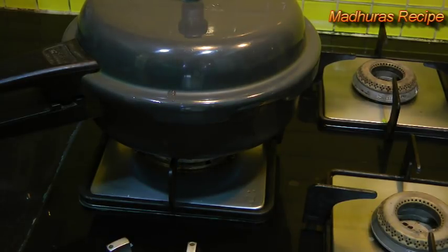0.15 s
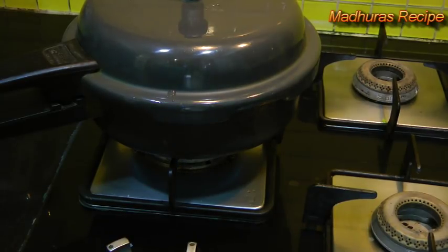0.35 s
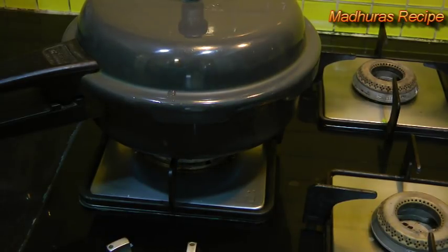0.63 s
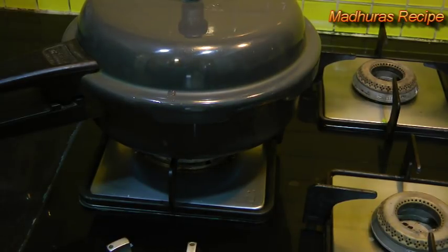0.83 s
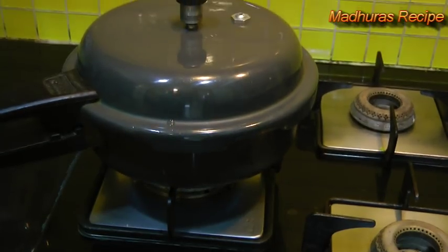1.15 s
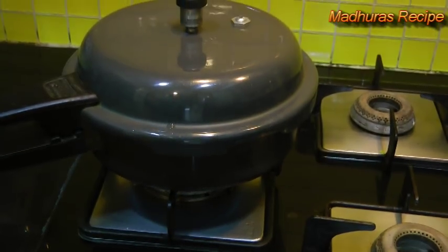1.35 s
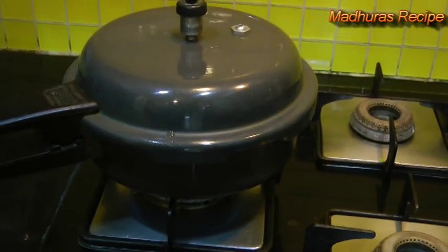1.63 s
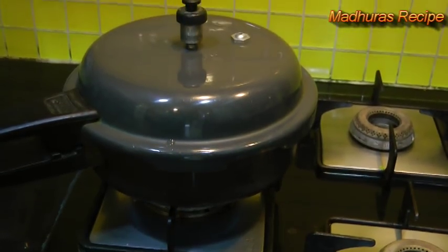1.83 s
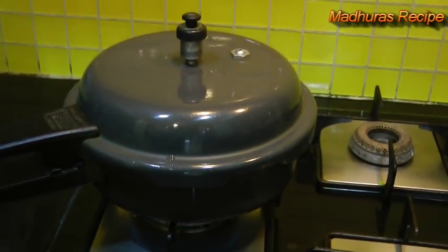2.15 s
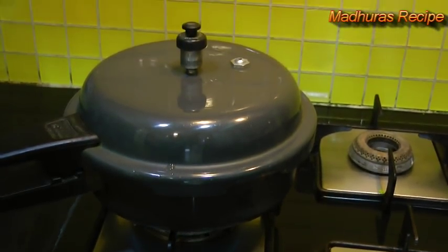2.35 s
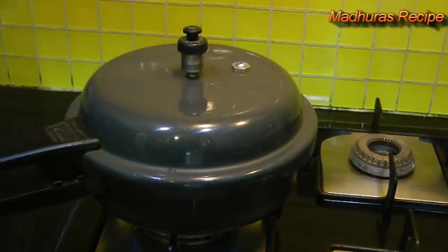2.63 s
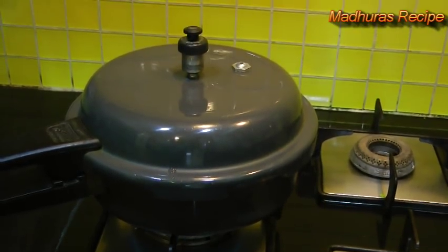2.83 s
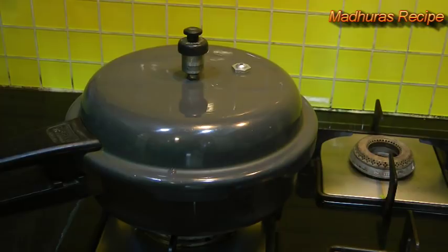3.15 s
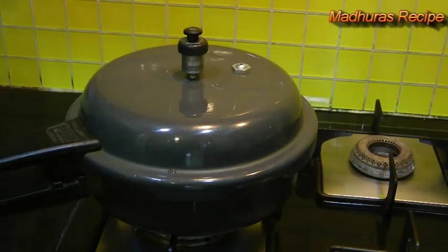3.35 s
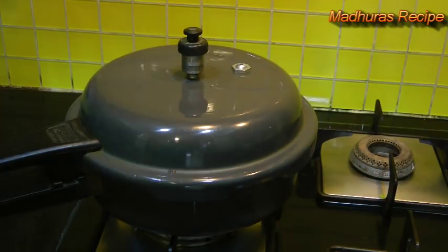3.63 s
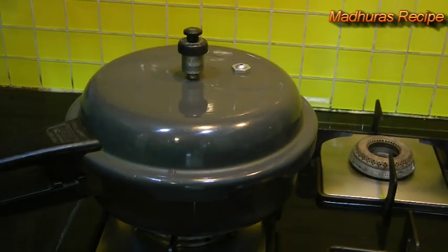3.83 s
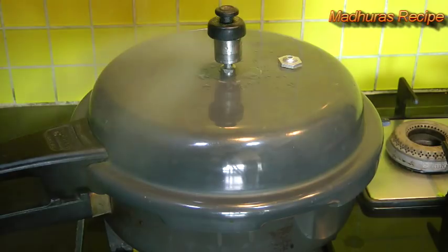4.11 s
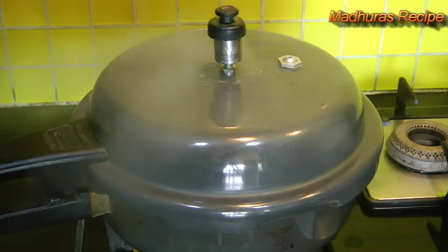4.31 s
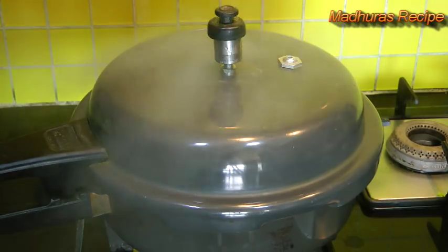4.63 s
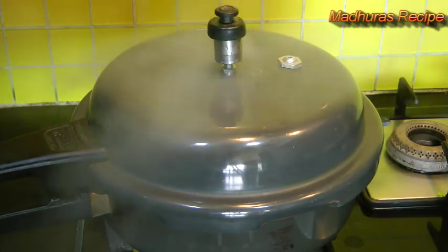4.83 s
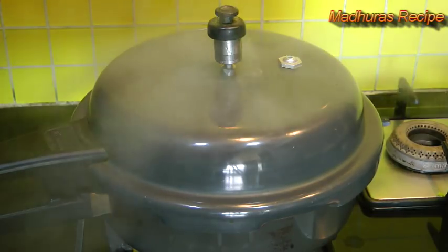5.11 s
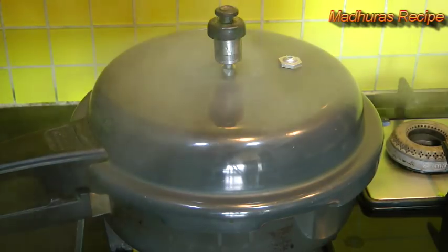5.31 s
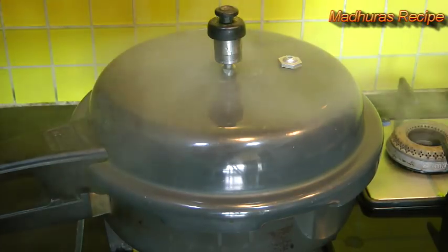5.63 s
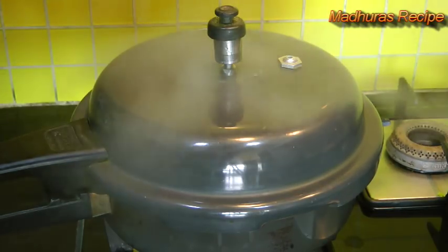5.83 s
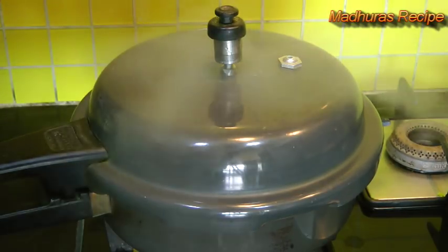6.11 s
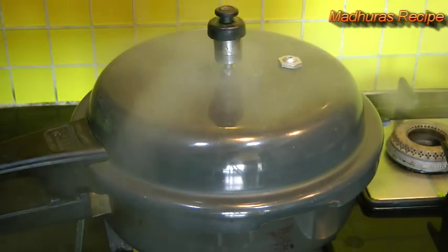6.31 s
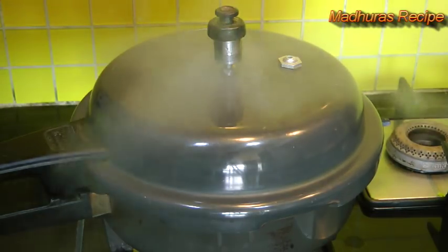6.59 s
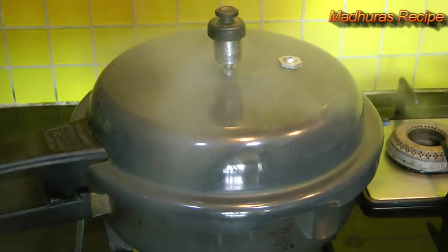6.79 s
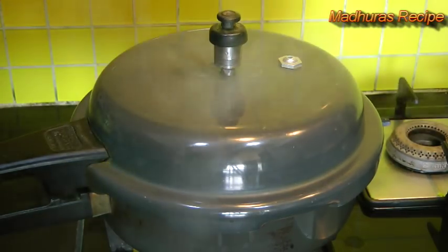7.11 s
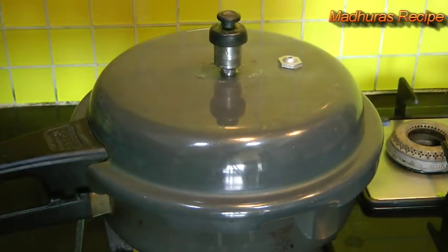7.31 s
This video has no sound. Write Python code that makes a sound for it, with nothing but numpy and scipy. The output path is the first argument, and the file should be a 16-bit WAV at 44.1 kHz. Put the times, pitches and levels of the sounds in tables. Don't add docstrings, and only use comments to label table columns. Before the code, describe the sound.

Low bumps and a faint simmering hum in a kitchen cut suddenly to roaring steam hiss, which stops as the valve weight clacks shut.

```python
import sys
import numpy as np
from scipy import signal
from scipy.fft import rfft, irfft, next_fast_len
from scipy.io import wavfile
from scipy.ndimage import uniform_filter1d, map_coordinates

SR = 44100
rng = np.random.default_rng(int(sys.argv[2]) if len(sys.argv) > 2 else 0)


def elevation(decibels):
    levels = np.asarray(decibels, float)
    return 10 ** (levels / 20)


def generate_wav(signal):
    frames = np.transpose(np.atleast_2d(signal))
    scaled = np.clip(frames, -1, 1) * 32767
    pcm = np.round(scaled).astype(np.int16)
    wavfile.write(sys.argv[1], SR, pcm)


N = 328570
T = np.arange(N) / SR

CHANGE_S, SHUT_S = 3.886, 7.045
# pitch_hz, level_db (per Hz)
JET_SPECTRUM = [(15, -71), (25, -40), (273, -35), (664, -23.5), (1020, -16.5), (1700, -14.5), (2000, -10),
                (2410, -7), (4020, -2.5), (6690, -3), (7870, -2), (11800, -5.5), (15400, -12.5)]
# pitch_hz, width_hz, lift_db
VALVE_CAVITIES = [(2040, 240, 5), (2450, 240, -5), (3980, 310, 2), (5364, 61, 4.5), (8000, 1800, 2.5),
                  (11600, 1100, 2)]
JET_DB, JET_GROWS_DB_PER_S = -13, 0.33
SAG_S, SAG_DB = 0.1, -1.8
# pitch_hz, width_hz, level_db
LID_MODES = [(552, 130, 0.5), (708, 98, 1.5), (1225, 220, -2), (1570, 320, -5), (1695, 82, 1),
             (2130, 330, -1.5)]
# start_s, level_db
SEAT_BLOWS = [
    (7.054, -1.5),
    (7.0605, 8.5),
    (7.063, -3),
    (7.07, 1.5),
    (7.079, -8),
    (7.088, -4),
]
# start_s, level_db, pitch_hz, t60_s
POT_THUD = (7.062, -40, 60, .4)
# pitch_hz, t60_s
KITCHEN_T60 = [(300, 0.63), (700, 0.58), (1300, 0.57), (3000, 0.49), (6000, 0.69), (9500, 0.42),
               (14000, 0.23)]

# time_s, effort_db
GRIP_EFFORT = [(0.0, -42), (0.09, -43), (0.26, -46), (0.36, -51), (0.6, -46), (1.26, -45.5), (1.96, -52.5),
               (2.5, -45), (2.64, -40), (2.75, -44), (2.88, -39), (3.21, -43.5), (3.48, -45), (3.66, -39),
               (3.74, -40), (3.88, -56)]
# pitch_hz, level_db (per Hz)
CREAK_SPECTRUM = [(41, -45), (70, -4.5), (135, -1), (194, -7), (233, -6.5), (372, -15), (500, -13),
                  (650, -47), (1100, -120)]
# start_s, peak_db, pitch_hz
FINGER_KNOCKS = [(0.032, -31, 205), (0.062, -23, 246), (0.089, -26, 142), (0.109, -32, 149),
                 (0.684, -26.5, 158), (0.995, -25, 122), (1.005, -39, 400), (2.457, -15, 141),
                 (2.508, -27, 186), (2.583, -28.5, 175), (2.674, -25, 159), (2.718, -22, 160),
                 (2.761, -20, 147), (2.928, -27, 167), (2.963, -15.5, 229), (2.984, -22, 261),
                 (2.998, -18.5, 240), (3.018, -22.5, 200), (3.057, -24, 247), (3.266, -32, 180),
                 (3.428, -30, 140), (3.499, -29.5, 198), (3.84, -22, 130)]
# start_s, peak_db
PALM_THUMPS = [
    (0.045, -17),
    (0.249, -28),
    (0.592, -22.5),
    (2.699, -17),
    (3.001, -14),
    (3.655, -18),
    (3.834, -24),
    (3.853, -24),
]
# start_s, peak_db, t60_s, pitch_hz
SHELL_SNAPS = [
    (2.457, -34, .03, 500),
    (2.755, -36, .035, 6200),
    (2.959, -40, .2, 6000),
    (2.996, -28, .045, 650),
]
# start_s, level_db, pitch_hz, t60_s
MOUNT_RINGS = [
    (.955, -10.5, 20.8, 0.94),
    (3.8, -22, 24.5, .7),
]
SWAY_DB, SWAY_GROWS = -41.5, 1.4
CREAK_DB, CREAK_GROWS = -44.5, 0.86
KNOCK_T60_S, THUMP_HZ, THUMP_T60_S = 0.09, 75, 0.047
RUB_S, RUB_HOLD_S, RUB_EDGE_S, RUB_DB = 0.95, 0.07, 0.03, -53

# pitch_hz, width_hz, level_db
POT_MODES = [(714, 84, -1), (1300, 72, -8.5), (1425, 56, -4), (1814, 36, -2), (2636, 23, -11.5),
             (3380, 280, -13), (3990, 99, -16.5), (4420, 104, -16), (5290, 200, -23.5), (7290, 200, -20),
             (8740, 87, -19), (9500, 180, -20.5), (10000, 190, -20), (13800, 700, -30)]
# pitch_hz, level_db (per Hz)
FLAME_SPECTRUM = [(88, -55), (150, -19), (519, -15.5), (708, -3.5), (966, -15.5), (1800, -13.5),
                  (2140, -20), (3350, -20.5), (4930, -23.5), (10100, -26), (15500, -40.5)]
SIMMER_DB = -51.5
# start_s, hold_s, level_db, grit_share
FAR_SCRAPES = [
    (1.16, 0.11, -45, .02),
    (3.568, 0.11, -39, .2),
]
SCRAPE_RISE_S, SCRAPE_FALL_S = 0.061, 0.19

# pitch_hz, level_db (per Hz)
LEAK_SPECTRUM = [(15, -46), (25, -20), (98, -9), (203, -9), (296, -5), (468, -10), (535, -16), (1080, -13),
                 (2170, -14.5), (6880, -13.5), (10500, -17.5), (15400, -29)]
# time_s, leak_db
GAIN_RECOVERY = [
    (6.95, -50),
    (7.04, -42),
    (7.3, -41.5),
    (7.45, -39),
]
# start_s, level_db
CAPSULE_STEPS = [
    (5.741, -26.5),
    (5.752, -31),
]

GAP_S, GAP_HZ = 0.017, 3000
TOP_HZ = 15500
SPREADS = [4.263, 4.588, 5.099, 5.54, 6.33, 6.376, 6.516, 6.933]
SPREAD_LOW_HZ, SPREAD_WIDE_HZ, SPREAD_SHARE = 4200, 1400, 0.3


def steam():
    lift_db = lambda hz: sum(db * bell(hz, c, w) for c, w, db in VALVE_CAVITIES)
    surge_db = 0.5 * wobble(7) + 0.23 * wobble(25) + 0.68 * wobble(120)
    sag_db = SAG_DB * np.clip((T - SHUT_S) / SAG_S + 1, 0, 1)
    choke_db = -60 * np.maximum(T - SHUT_S, 0) / 0.15 + sag_db
    flow = elevation(JET_DB + JET_GROWS_DB_PER_S * (T - CHANGE_S) + surge_db + choke_db)
    colour = lambda hz: elevation(along(JET_SPECTRUM, hz) + lift_db(hz))
    jets = [rush(colour, patchy_db=0.86) for port in range(3)]
    return sum(kitchen(jet * flow, wet_db=-5.0) for jet in jets) / np.sqrt(len(jets))


def weight():
    blows = np.zeros(N)
    for s, db in SEAT_BLOWS:
        blows[round(s * SR)] = elevation(db + 18)

    def lid(hz):
        modes = [elevation(db) * 1j * hz * w / (c * c - hz * hz + 1j * hz * w) for c, w, db in LID_MODES]
        return sum((-1) ** k * mode for k, mode in enumerate(modes))

    clack = filtered(uniform_filter1d(blows, size=7), lid)
    return kitchen(clack, wet_db=-5.0) + ring(*POT_THUD, attack=0.004)


def hand():
    effort_db = curves(GRIP_EFFORT)[0] - np.mean(GRIP_EFFORT, axis=0)[1]
    sway = rush(lambda hz: bell(hz, 28, 46) * (hz > 8), patchy_db=-0.5)
    sway = sway * elevation(SWAY_DB + SWAY_GROWS * effort_db)
    creak = rush(lambda hz: elevation(along(CREAK_SPECTRUM, hz)), patchy_db=4.0)
    creak = creak * elevation(CREAK_DB + CREAK_GROWS * effort_db + 2.0 * wobble(40))
    knocks = sum(ring(s, db + 0.5, hz, KNOCK_T60_S, attack=0.00078) for s, db, hz in FINGER_KNOCKS)
    thumps = sum(ring(s, db, THUMP_HZ, THUMP_T60_S, attack=0.0016) for s, db in PALM_THUMPS)
    shake = sum(ring(s, db, hz, t60, attack=0.027) for s, db, hz, t60 in MOUNT_RINGS)
    snaps = np.zeros(N)
    for s, db, t60, centre_hz in SHELL_SNAPS:
        decay = elevation(db - 60 * np.maximum(T - s, 0) / t60) * (T > s)
        snaps += decay * rush(lambda hz: bell(hz, centre_hz, 1.6 * centre_hz) ** 2, patchy_db=-1.0)
    rub = elevation(RUB_DB) * stroke(RUB_S, RUB_EDGE_S, RUB_HOLD_S, 2 * RUB_EDGE_S)
    rub = rub * rush(lambda hz: bell(hz, 7000, 7000), patchy_db=1)
    return sway + creak + knocks + thumps + shake + snaps + rub


def stove():
    pot_power = lambda hz: sum(elevation(2 * db) * bell(hz, c, w) ** 1.46 for c, w, db in POT_MODES)
    hum = rush(lambda hz: np.sqrt(pot_power(hz)), patchy_db=0.5)
    hiss = rush(lambda hz: elevation(along(FLAME_SPECTRUM, hz)), patchy_db=2.4)
    level = elevation(SIMMER_DB + 0.4 * wobble(6))
    scrape = np.zeros(N)
    for s, hold, db, grit in FAR_SCRAPES:
        far = rush(lambda hz: bell(hz, 1066, 330) ** 2 + grit * bell(hz, 1800, 2600), patchy_db=3.0)
        scrape += elevation(db) * stroke(s, SCRAPE_RISE_S, hold, SCRAPE_FALL_S) * far
    return level * (elevation(9.5) * hum + elevation(8.5) * hiss) + scrape


def leak():
    return elevation(curves(GAIN_RECOVERY)[0]) * rush(lambda hz: elevation(along(LEAK_SPECTRUM, hz)), patchy_db=2.0)


def capsule():
    out = np.zeros(N)
    for s, db in CAPSULE_STEPS:
        onset = np.clip((T - s) / 0.00057, 0, 1)
        out -= elevation(db) * np.exp(-np.maximum(T - s, 0) / 0.017) * onset
    return out


def kitchen(x, wet_db):
    hz, t, z = signal.stft(rng.standard_normal(SR // 2), SR, nperseg=256)
    decay = elevation(-60 * t / along(KITCHEN_T60, hz)[:, None])
    tail = signal.istft(z * decay, SR, nperseg=256)[1]
    wet = signal.fftconvolve(x, tail / np.linalg.norm(tail))[:N]
    return (x + elevation(wet_db) * wet) / np.hypot(1, elevation(wet_db))


def rush(response, patchy_db):
    z = signal.stft(rng.standard_normal(N), nperseg=512)[2]
    field = uniform_filter1d(rng.standard_normal(z.shape), size=6, axis=0)
    field = uniform_filter1d(field, size=12, axis=1)
    patchy = signal.istft(z * elevation(patchy_db * unit(field)), nperseg=512)[1][:N]
    return unit(filtered(patchy, response))


def ring(s, db, hz, t60, attack):
    out, start = np.zeros(N), int(s * SR) + 1
    t = T[start:start + int(1.5 * t60 * SR)] - s
    tone = np.sin(2 * np.pi * hz * t) * (1 - np.exp(-t / attack))
    out[start:start + len(t)] = elevation(db - 60 * t / t60) * tone
    return out


def stroke(s, rise, hold, fall):
    return np.clip((T - s) / rise, 0, 1) ** 2 * elevation(-20 * np.maximum(T - s - rise - hold, 0) / fall)


def bell(hz, centre_hz, width_hz):
    return 1 / (1 + (2 * (hz - centre_hz) / width_hz) ** 2)


def wobble(rate):
    return map_coordinates(rng.standard_normal(int(N * rate / SR) + 4), [T * rate])


def curves(rows):
    s, *cols = np.transpose(rows)
    return [np.interp(T, s, c) for c in cols]


def along(points, hz):
    f, v = np.transpose(points)
    return np.interp(np.log(hz + 1), np.log(f + 1), v)


def filtered(x, response):
    m = next_fast_len(N + SR // 2)
    return irfft(rfft(x, m) * response(np.fft.rfftfreq(m, 1 / SR)), m)[:N]


def unit(x):
    return x / np.sqrt(np.mean(x ** 2) + 1e-20)


def edge(hz, top_hz):
    return np.clip((top_hz - hz) / 150 + 0.5, 0, 1)


def thinned(x, hole_db, greed, tilt_db):
    hz, _, z = signal.stft(x, SR, window="cosine", nperseg=2048)
    band_db = lambda rows: 10 * np.log10(np.sum(np.abs(z[rows]) ** 2, axis=0) + 1e-12)
    excess_db = np.minimum(band_db(hz < 400) - band_db(hz > 3000), 24)
    cells = uniform_filter1d(np.abs(z), size=3, axis=0)
    around = uniform_filter1d(np.abs(z), size=40, axis=0)
    bar_db = hole_db + greed * excess_db + tilt_db * np.log2(hz[:, None] / 10000 + 1e-3)
    keep = cells > around * elevation(np.minimum(bar_db, 2.5))
    return signal.istft(z * keep, SR, window="cosine", nperseg=2048)[1][:N]


def spread(x):
    other = np.roll(x, SR // 10)
    picks = rng.random((len(SPREADS), 8)) < SPREAD_SHARE
    band = lambda hz: np.clip((hz - SPREAD_LOW_HZ) // SPREAD_WIDE_HZ, 0, 7).astype(int)
    side = np.zeros(N)
    for s, pick in zip(SPREADS, picks):
        window = np.cos(np.clip((T - s) / 0.04, -0.5, 0.5) * np.pi) ** 2
        side += filtered(other * window, lambda hz: pick[band(hz)] * (hz > SPREAD_LOW_HZ) * edge(hz, TOP_HZ))
    return side


def scene():
    before = stove() + hand()
    dull = filtered(before, lambda hz: edge(hz, GAP_HZ))
    before = before + (dull - before) * np.clip((T - CHANGE_S + GAP_S) / 0.002, 0, 1)
    after = steam() + weight() + leak() + capsule()
    return np.tile(np.where(T < CHANGE_S, before, after), (2, 1))


def low_pass(x):
    return signal.sosfilt(signal.butter(12, 16610, fs=SR, output="sos"), x)


def record(dry):
    clipped = dry[0] / (1 + np.abs(dry[0] / 0.82) ** 6) ** (1 / 6)
    x = filtered(clipped, lambda hz: edge(hz, TOP_HZ))
    x = thinned(x, hole_db=-5.5, greed=0.3, tilt_db=6)
    mix = x + elevation(-1.0) * spread(x) * np.array([[1], [-1]])
    return low_pass(mix)


dry = scene()
out = record(dry)
generate_wav(out)
```